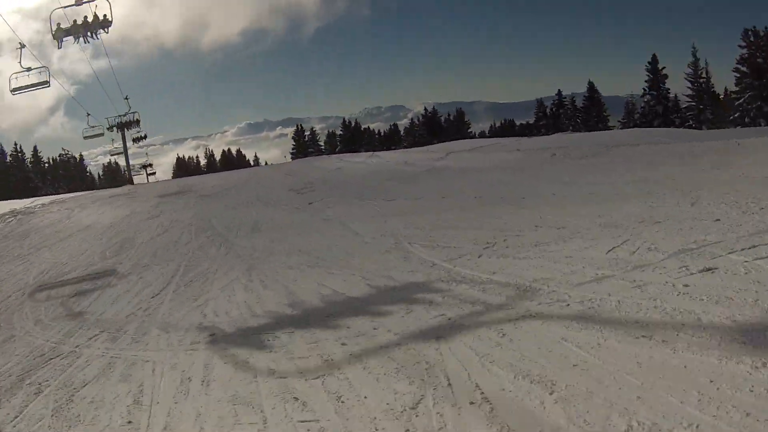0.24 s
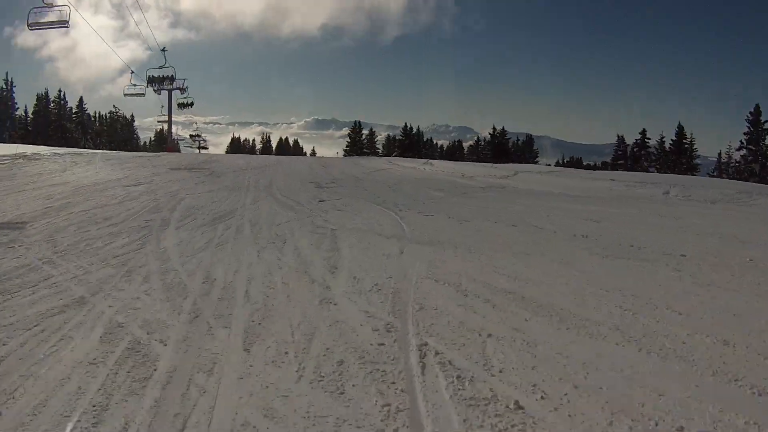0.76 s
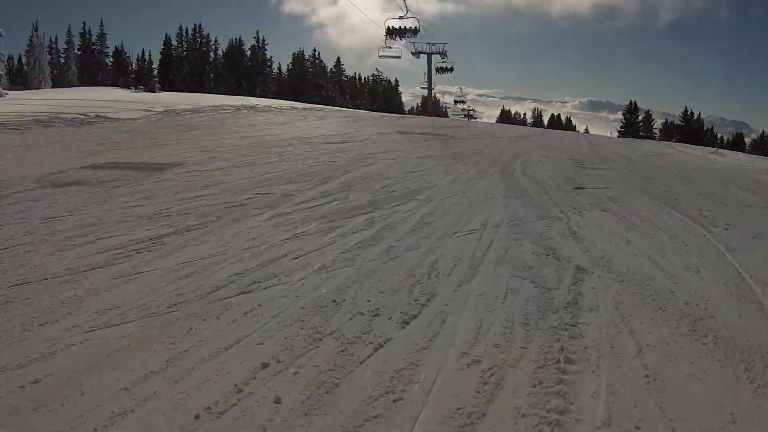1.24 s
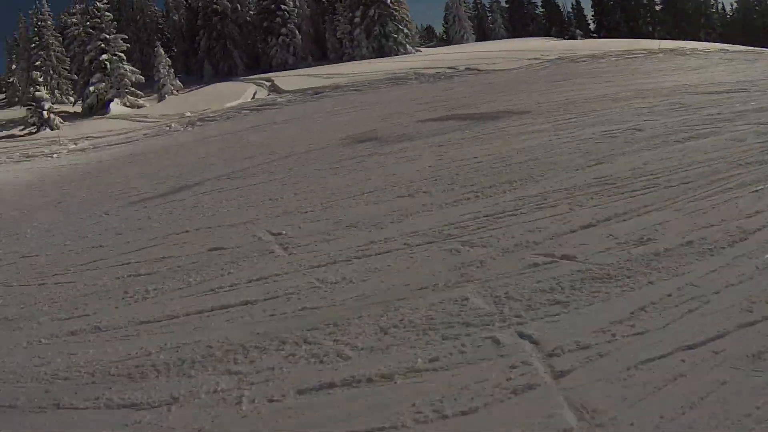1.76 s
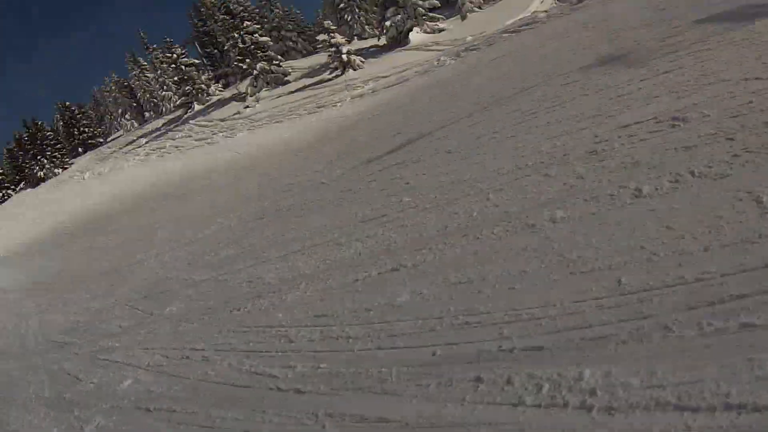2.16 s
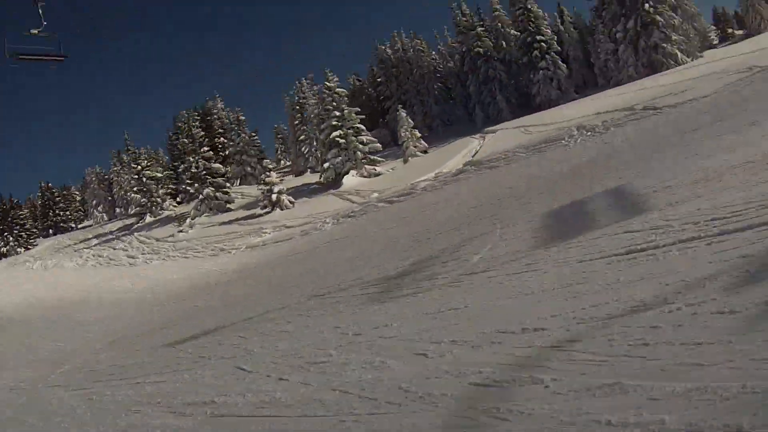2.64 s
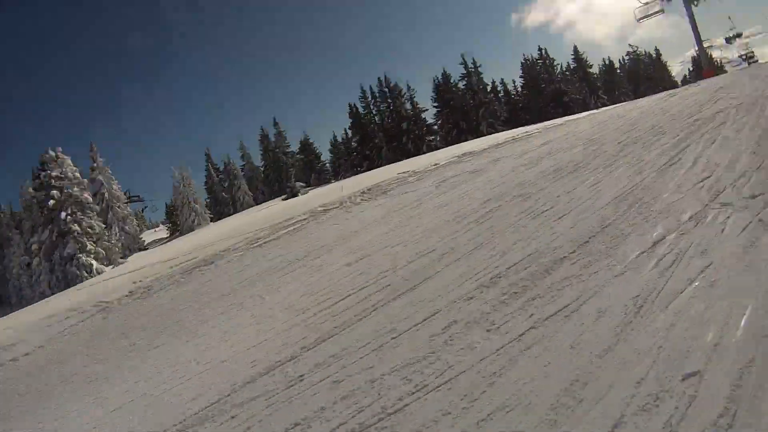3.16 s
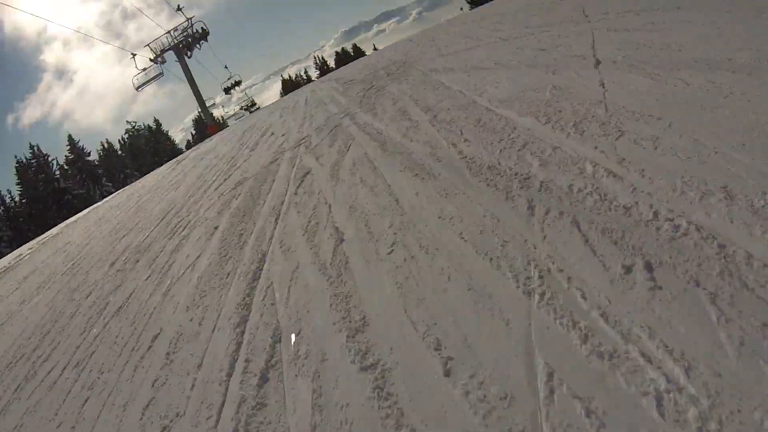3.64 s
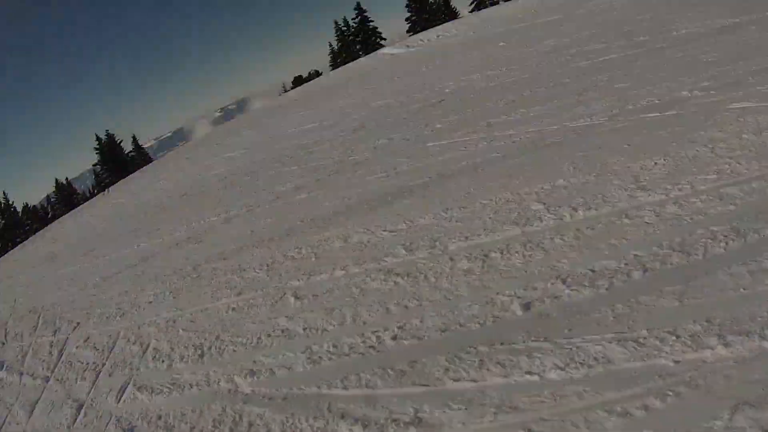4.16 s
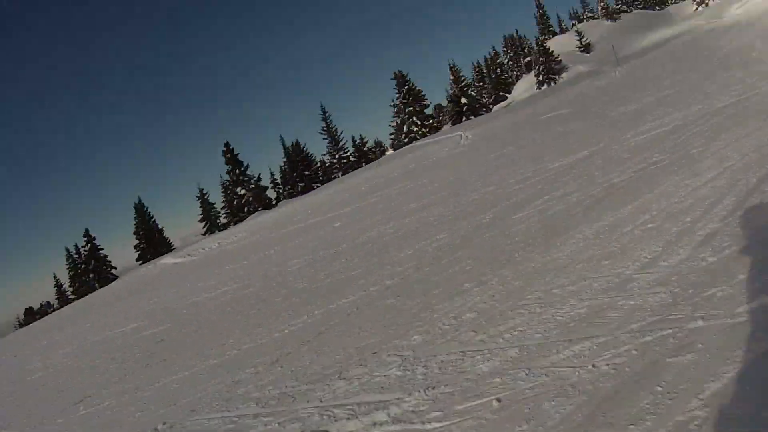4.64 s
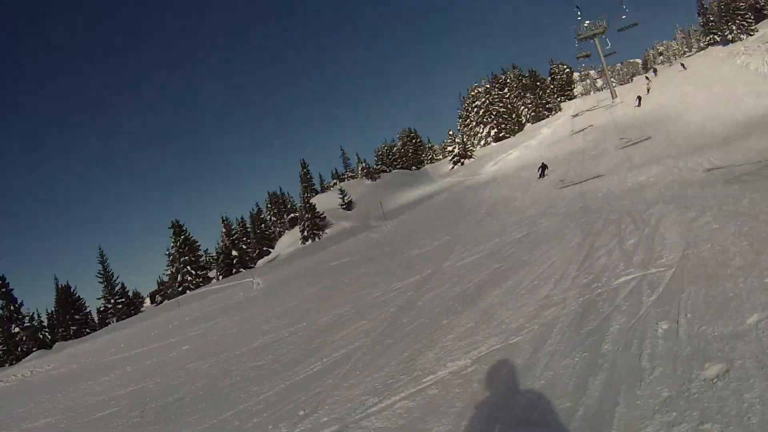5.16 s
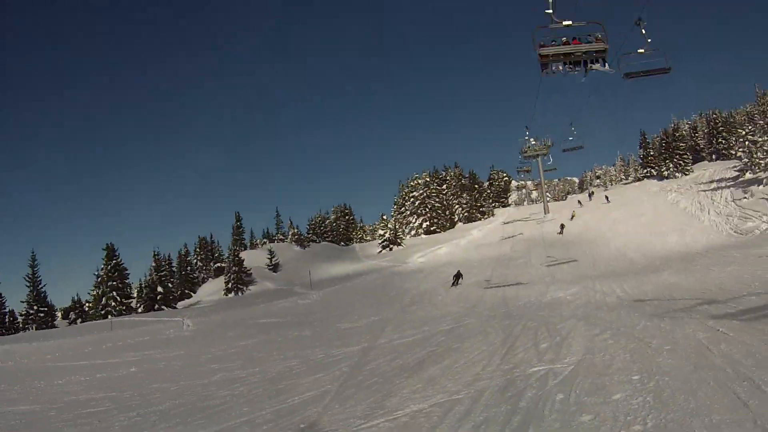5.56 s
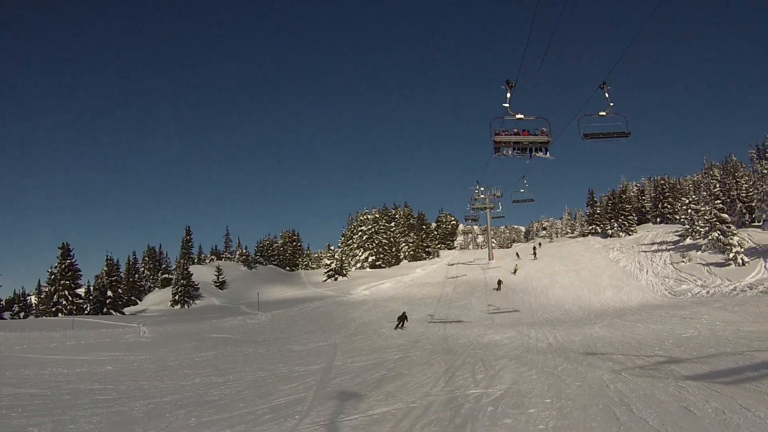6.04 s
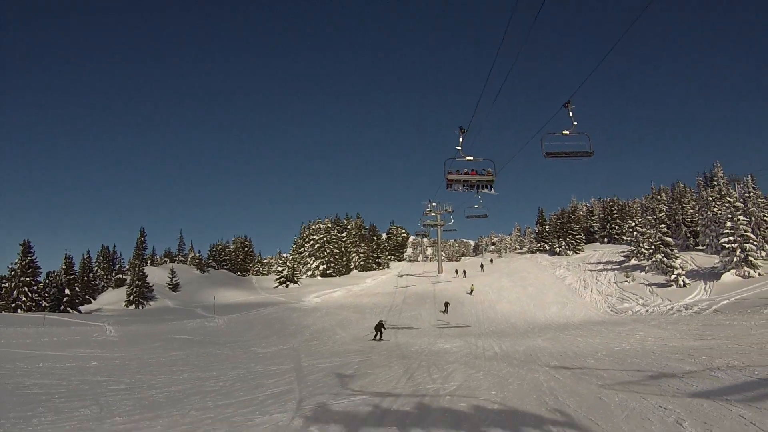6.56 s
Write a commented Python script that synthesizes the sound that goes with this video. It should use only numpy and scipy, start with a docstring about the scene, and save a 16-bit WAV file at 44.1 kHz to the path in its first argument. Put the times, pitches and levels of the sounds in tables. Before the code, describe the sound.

Inside a closed plastic camera case on a skier, edges scrape grainily over hard-packed snow with a soft hiss of spray. Wind rumbles and buffets. Dry knocks cluster after one second, peak violently just after two, and return in sharp blows until about five and a half. Then scraping and wind drop to a faint glide with sparse ticks.

```python
"""On a hard-packed piste a skier carves turns, wearing a camera in a closed plastic case.
Steel edges fracture the crust grain by grain and throw snow, heard as scrape, crunch and filtered-noise hiss.
Bumps make the case knock on its mount, and jolts swing it; wind noise rumbles and rushes over it.
Its resonances colour the scrape, flexing, crunch and knocks; most of the treble is shut out."""
import sys
import numpy as np
from scipy import signal
from scipy.fft import rfft, irfft
from scipy.io import wavfile
from scipy.ndimage import map_coordinates

SR = 44100
rng = np.random.default_rng(int(sys.argv[2]) if len(sys.argv) > 2 else 0)


def unload_wav(signal):
    """Save mono or channel-first audio to the path in sys.argv[1] as 16-bit WAV at rate SR, clipped to [-1, 1]."""
    wavfile.write(
        sys.argv[1],
        SR,
        np.round(np.clip(np.atleast_2d(signal).T, -1, 1) * 32767).astype(np.int16),
    )


N = 300304

# edges on the snow through the turns, before trim and grip: [t/s, scrape level/dB, spray level/dB]
EDGE_LEVELS = [(0.0, -42.7, -55.5), (0.49, -42, -54.5), (1.18, -41, -53), (1.36, -46, -57.5),
               (1.62, -48, -60), (1.85, -47, -58.5), (2.05, -39.5, -60), (2.24, -39, -57.5),
               (2.56, -43.5, -54.5), (2.69, -42, -58), (2.8, -50, -65), (2.93, -48.5, -64),
               (3.15, -56, -63.5), (3.28, -49.5, -62), (3.41, -44.5, -57.5), (3.66, -40.5, -55),
               (3.93, -40, -52.5), (4.2, -41.5, -52.5), (4.5, -45.5, -54), (5.01, -49, -54.5),
               (5.24, -52.5, -58), (5.37, -54, -62), (5.52, -49.5, -68), (5.68, -58, -67),
               (6.1, -60.5, -67.5), (6.81, -64, -70)]
# air flowing along the case, before trim and eddies: [t/s, rush level/dB]
WIND_LEVELS = [(0.0, -42.5), (0.66, -40), (1.6, -47.5), (1.93, -46.5), (2.27, -40), (2.58, -39),
               (3.02, -51.5), (3.17, -53.5), (3.35, -43.5), (4.23, -39.5), (4.8, -47.5), (4.95, -49),
               (5.2, -56.5), (5.36, -54), (5.44, -45), (5.58, -47.5), (5.69, -56), (5.88, -54),
               (6.16, -57.5), (6.39, -63.5), (6.81, -62.5)]
# gusts on the case in the turns, before trim and eddies: [start t/s, end t/s, level/dB]
GUST_SPANS = [(1.99, 2.218, -34), (2.306, 2.53, -35), (2.57, 2.92, -33.3), (4.47, 4.53, -34),
              (4.59, 4.92, -35.5), (5.118, 5.2, -40.5), (5.388, 5.507, -41), (5.6, 5.68, -41)]
# knocks of the case on its mount: [t/s, level/dB, most excited resonance f/Hz, low body/dB,
# ring near 2.3 kHz/dB, crack/dB]; the last three are relative to a plain knock, which omits them
KNOCK_EVENTS = [(0.0286, -35.5, 915), (0.054, -35, 900), (0.2535, -32, 895, 7, -3, 4), (0.7989, -36, 700),
                (0.8655, -35, 1580), (0.9402, -28.0, 1400, 2, 6, -3.0), (0.9583, -26.5, 1000, -6, -5, -5),
                (1.0327, -25.0, 696, -6, -11, -10.0), (1.0941, -28, 1000, -1, -4, -12), (1.143, -34, 950),
                (1.173, -31, 1400, 12, 9, 6.0), (1.1962, -26.5, 900, 14, 9, 3.0),
                (1.2152, -31.0, 900, -9, 4.0, 1.0), (1.443, -35.5, 800), (1.4918, -32.5, 800),
                (1.5147, -24.0, 500, -17.5, -3.0, -0.5), (1.5269, -35, 900),
                (1.535, -26.5, 1500, -3, 1.0, 5.5), (1.6433, -36, 1000),
                (1.653, -28.5, 1500, 29, -5.0, -1.0), (1.7029, -26, 900, 13, -5, -4), (1.7088, -30, 900),
                (1.7448, -24.5, 800, 5.0, -2.5, -9), (1.7755, -16.5, 1100, -14.5, 14.5, 0),
                (1.8635, -40, 1030), (1.875, -37, 500), (1.9237, -12.5, 1770, -3, 0, 0),
                (1.9797, -36, 1100), (2.0119, -16.0, 900, -7.5, -1.5, -2), (2.0444, -27, 1700, 3, 11, 5.0),
                (2.1041, -16.0, 1800, -6, 19.5, 7.5), (2.1156, -25.0, 800, 3.0, 3.0, -7.0),
                (2.1276, -27, 900, 4, 6, -5.0), (2.1356, -32, 500), (2.1687, -32, 1460),
                (2.1871, -6, 1100, -2, -6, 7), (2.2205, -22.5, 1810, -5, 1, 6.5), (2.235, -31, 2200),
                (2.3262, -24.5, 990, 8.0, -5, 2), (2.391, -27, 1900, 6.5, 2.0, -3.0),
                (2.4519, -18.0, 890, 1.0, 2.5, 7), (2.4952, -26.0, 1900, 6, -6, -5), (2.5585, -35, 2200),
                (2.5723, -37, 900), (2.7328, -20.5, 1820, -10, -10, 0.5), (2.7895, -35.5, 900),
                (2.8745, -40, 1420), (2.8902, -28.5, 2280), (2.918, -29, 1600, 2.0, 3, 8.0),
                (2.9246, -31.0, 2300, -10, -2, 7), (3.0046, -37.5, 1700), (3.0206, -32.5, 800, -8, -7.0, 4),
                (3.031, -35.5, 2020, -19.0, -3.0, 4), (3.0649, -39.0, 900, 2.0, -1, 14),
                (3.0722, -40.5, 900, -4, 2.0, 7), (3.1205, -42, 500, 28.0, -1.0, -0.0), (3.1449, -46, 900),
                (3.2446, -30, 1700, 18, -7, -3.0), (3.3051, -24, 1800, 2, 2, 7),
                (3.318, -11, 910, -5, 0, 5), (3.4442, -29, 2300, -3, -14, -0.0), (3.6061, -31, 1300),
                (3.6731, -28.5, 2210, -4, -6, 4.0), (3.6861, -28.0, 2300, 4, 2.0, 10), (3.711, -34, 1420),
                (3.7523, -21, 900, 6, 4, -2), (3.7683, -28.0, 700), (3.8105, -20.5, 800, -13.5, -3.0, 2),
                (3.871, -15, 1710, -22, 14.0, 4), (3.9624, -36, 900), (4.12, -33.5, 2300),
                (4.1441, -26, 900, -3.0, 3.5, 5), (4.1505, -31, 900), (4.2107, -28, 900, 2, 2.0, 10),
                (4.2176, -29.5, 1460), (4.2417, -29.5, 1800, 4.5, 7.5, 12), (4.3058, -36, 500),
                (4.344, -32.5, 600, 6, 3.0, 14), (4.3995, -32.5, 900, -6.0, -10, -11.0),
                (4.5085, -10.5, 2300, -9.5, 8.5, 9.5), (4.5191, -34, 900), (4.5611, -36, 900),
                (4.5906, -22.5, 1500, -16, 12, 7), (4.6437, -19.5, 1000, -12, 12.0, 0), (4.7414, -39, 990),
                (4.7892, -27.5, 1500, -7, 9, 5.0), (4.8214, -36.5, 2300), (4.843, -30.5, 2300),
                (4.943, -25, 815), (4.955, -29.5, 700, 1, 6.0, -2.0), (4.998, -28.5, 1400, 6.5, 7.5, 2.0),
                (5.0975, -26, 1200, -9.5, -5.0, -4), (5.1202, -37, 500),
                (5.1285, -34.5, 700, 8, 11.0, 10.0), (5.1396, -37.0, 1400),
                (5.1556, -16.0, 1510, -8, 12, 20), (5.173, -37, 2300), (5.1916, -38.5, 1800),
                (5.2897, -34, 2320), (5.3879, -14.5, 2300, -2.5, -1.0, -5.0),
                (5.4252, -14.5, 1090, 1.5, 10.5, 7), (5.4526, -32.5, 2300, 10.0, -1.0, 9.0),
                (5.4686, -27, 1500, 0, 4, 4), (5.4728, -29.5, 800, 4, 7.5, 3), (5.519, -40, 820),
                (5.5305, -35.5, 500, 16.0, -8.0, -2.0), (5.554, -34.5, 1400, 18, 11, 9),
                (5.5654, -23, 2300, -3, -1, 9.0), (5.6437, -35, 1000), (5.7219, -30.5, 1300, -1.0, -1, -6),
                (5.7297, -23.5, 800, -9, -2, -1), (5.7415, -33.0, 1100, 3, 1.0, 11), (5.7515, -34.5, 1400),
                (5.854, -36.5, 900, 9, -4.0, -6.0), (5.8813, -35, 800), (5.9737, -41, 1500, 13, -6.0, 7),
                (6.0642, -47, 800), (6.0981, -31.5, 1400, 0, 3, 4), (6.1642, -30, 2200), (6.1713, -36, 800),
                (6.2943, -30.5, 1400, 4, 11.5, 10.5), (6.3401, -49, 1400),
                (6.4348, -44, 2300, 14, -14, -7.0), (6.4993, -51, 2300), (6.5682, -32, 1390, 0, 8, 4),
                (6.7066, -42.0, 2300)]
# jolts that push the whole case: [t/s, envelope peak level/dB, f/Hz]
THUMP_EVENTS = [(0.335, -21.5, 183), (2.188, -14, 193), (2.451, -20, 194), (4.15, -21, 248),
                (4.171, -16.5, 222), (5.156, -17.5, 130), (5.426, -19, 246), (5.563, -20.5, 292)]
# stretches of rutted crust: [start t/s, end t/s, crunch level/dB]
RUT_SPANS = [(1.56, 1.72, -46), (1.87, 2.0, -46), (2.13, 2.29, -48), (2.3, 2.33, -36), (2.33, 2.88, -50),
             (5.98, 6.08, -57)]
# direction of the spray: [t/s, power share past the camera's front (0 = all away from it)]
SPRAY_DIRECTION = [(0, 0.033), (3.2, 0.03), (3.65, 0.75), (4.1, 0.86), (5.2, 0.77), (5.6, 0.16),
                   (6.81, 0.3)]
# resonances of the case: [f/Hz, width at half lift/Hz, lift at full share/dB]
CASE_RESONANCES = [(545, 190, 2), (900, 280, 8.3), (1045, 140, 3), (1425, 300, 8.7), (1830, 170, 3.5),
                   (2323, 370, 8), (3010, 200, 3.5), (3710, 350, 5), (6350, 310, 5.5)]

# spectral densities, each up to an overall level: [f/Hz, level/dB per Hz]
# ice scraped by the edges
SCRAPE_SPECTRUM = [(200, -18.5), (700, -7), (1150, -8.8), (1600, 1.3), (2100, -2.4), (2600, -7),
                   (2950, -17.5), (3800, -22), (5000, -24.5), (9000, -52.5), (15000, -72)]
# flexing skis
FLEX_SPECTRUM = [(120, -9), (300, 0), (500, 3.5), (900, -7.5), (1300, -25), (2500, -27), (5000, -57.5)]
# spray flying away from the camera
SPRAY_AWAY_SPECTRUM = [(1800, -14.5), (3100, -1), (3700, 5.5), (4200, -0.5), (4900, -0.5), (5600, -8.5),
                       (6100, -6.5), (7000, -17), (8200, -16.5), (10000, -28.5), (12000, -32.5),
                       (15000, -48)]
# spray flying past the front of the camera
SPRAY_FRONT_SPECTRUM = [(1800, -8.5), (2700, 4), (3200, -13), (3900, 7), (4600, -3), (5400, 0), (6400, -13),
                        (7600, -16), (8700, -10), (10000, -20.5), (11300, -24), (12700, -26), (15000, -35)]
# large eddies buffeting the case
BUFFET_SPECTRUM = [(8, -25.5), (25, -11.5), (48, -5), (64, 2.5), (82, -5), (120, -9.5), (200, -21),
                   (500, -43.5), (2000, -72)]
# deepest rumble of the wind
DEEP_SPECTRUM = [(8, -11.5), (25, -2.5), (40, -6), (70, -19.5), (200, -48.5), (1000, -80)]
# small eddies along the walls; also the low rumble of the skis
RUSH_SPECTRUM = [(40, -12.5), (110, 1.5), (200, -1), (300, -7), (500, -15.5), (1200, -44), (4000, -86.5)]
# hiss of the microphone
HISS_SPECTRUM = [(1000, 0.5), (5000, 2), (8000, -3.5), (12000, -7), (13000, -14.5), (15000, -30)]
# contact of the case and its mount, without the resonances
KNOCK_SPECTRUM = [(40.0, -18.0), (200.0, -0.5), (400.0, 0), (700.0, -3.5), (1200.0, -2.1), (2000.0, -2.6),
                  (2550.0, -7.0), (2820.0, -17.5), (3700.0, -25.2), (4400.0, -29.5), (5400.0, -30),
                  (6100.0, -37.2), (6700.0, -35), (8500.0, -50), (11500.0, -55.5), (15000.0, -74)]
# coarse crust breaking
CRUNCH_SPECTRUM = [(150, -22), (500, -4), (1000, 0), (1250, -13), (12000, -100)]
# ski sliding sideways
SKID_SPECTRUM = [(4500, -29), (6000, 0), (6700, 3.5), (7800, -7), (9200, -8), (10500, -18), (15000, -23)]

# a bump shakes the skis: time constants (s), level for a 0 dB knock (dB), dB of shaking per dB of knock
SHAKE_RISE_S, SHAKE_DECAY_S, SHAKE_DB, SHAKE_GROWS = 0.0035, 0.052, -39.3, 0.67
# steady judder and crumbs relative to the tabled scrape, rumble relative to the shaking (dB)
JUDDER_DB, CRUMBS_DB, RUMBLE_DB = -9, -5.5, -3.5
# buffeting between gusts: level for a 0 dB rush (dB), dB of buffet per dB of rush
BUFFET_DB, BUFFET_GROWS = -18, 0.59
# deepest rumble: level for a 0 dB buffet (dB), dB of rumble per dB of buffet
DEEP_DB, DEEP_GROWS = -19.7, 0.61
# rise and fall of a gust or a stretch of ruts (s)
SPAN_EDGE_S = 0.035
# room for the scuff before a blow (s); range of time from first touch to blow (s)
LEAD_S, TOUCH_S = .008, (0.00031, .001)
# lift of the most excited resonance (dB), its width (Hz); its range for small ticks (Hz)
STRUCK_DB, STRUCK_WIDTH_HZ, TICK_HZ = 7, 580, (700, 2360)
# scatter of the resonances' strength and pitch between knocks (standard deviation, as shares)
STRENGTH_SCATTER, PITCH_SCATTER = .14, .012
# skid at the beginning of a turn: peak time (s), level before flutter (dB), slopes (dB per s)
SKID_S, SKID_DB, SKID_RISE_DB_PER_S, SKID_FALL_DB_PER_S = 3.61, -62, 70, 19
# gain control: threshold (full scale), gain divisor added per full-scale second, recovery (s)
OVERLOAD, DUCK_PER_S, RECOVER_S = .8, 450, .05
# upper band limit of the camera (Hz)
TOP_HZ = 15100


def amp(db):
    """Logarithmic level: decibels become an amplitude ratio."""
    return 10 ** (np.asarray(db) / 20)


def unit(x):
    """Normalization: the mean power is brought to one."""
    return x / np.sqrt(np.mean(x ** 2) + 1e-20)


def along(points, hz):
    """Logarithmic frequency: values are interpolated on a log axis."""
    f, v = np.transpose(points)
    return np.interp(np.log(hz + 1), np.log(f), v)


def curves(rows):
    """Linear interpolation: each column after the time gives one value per sample."""
    s, *columns = np.transpose(rows)
    t = np.arange(N) / SR
    return [np.interp(t, s, column) for column in columns]


def wobble(rate):
    """Slow random fluctuation: a spline through random knots, rate of them a second."""
    knots = rng.standard_normal(int(N * rate / SR) + 4)
    return map_coordinates(knots, [np.arange(N) * rate / SR])


def add(track, s, sound):
    """Superposition: a sound is summed into the track from s seconds on."""
    part = track[round(s * SR):][:len(sound)]
    part += sound[:len(part)]


def causal(gain_db):
    """Minimum phase: folding the cepstrum gives the promptest response with these gains."""
    cepstrum = irfft(np.log(amp(gain_db)))
    half = len(cepstrum) // 2
    cepstrum[1:half] *= 2
    cepstrum[half + 1:] = 0
    return irfft(np.exp(rfft(cepstrum)))


def case_peaks(hz):
    """Resonance: each mode of the case lifts a bell-shaped band, one row of dB each."""
    return np.array([lift_db / (1 + (2 * (hz - centre) / width) ** 2)
                     for centre, width, lift_db in CASE_RESONANCES])


def coloured(x, spectrum, ring=0, size=8192):
    """Linear filtering: a spectrum and any share (ring) of the case's resonances shape x, at rms 1."""
    hz = np.fft.rfftfreq(size, 1 / SR)
    response = causal(along(spectrum, hz) + ring * case_peaks(hz).sum(0))
    return unit(signal.fftconvolve(x, response)[:N])


def grains(rate, spread_db):
    """Shot noise: randomly timed impulses of uneven size, rate a second, at rms 1."""
    present = rng.random(N) < rate / SR
    sizes = rng.standard_normal(N) * amp(spread_db * rng.standard_normal(N))
    return unit(present * sizes)


def stretches(rows):
    """Power addition: (start, end, dB) spans that rise, hold and fall are summed as power."""
    t, power = np.arange(N) / SR, 0
    for start, end, db in rows:
        gate = np.clip(np.minimum(t - start, end - t) / SPAN_EDGE_S + .5, 0, 1)
        power = power + (amp(db) * gate) ** 2
    return power


def shaking():
    """Transient vibration: the skis' amplitude swells into each bump and decays exponentially after."""
    t, power = np.arange(0, N, 64) / SR, 0
    for s, db, *_ in KNOCK_EVENTS:
        fade = np.where(t < s, (s - t) / SHAKE_RISE_S, (t - s) / SHAKE_DECAY_S)
        bump = amp(SHAKE_DB + SHAKE_GROWS * db) * np.exp(-np.abs(fade))
        power = power + bump ** 2
    return np.interp(np.arange(N) / SR, t, np.sqrt(power))


def judder():
    """Incoherent addition: the flexing joins a steady share of scrape and the shaking from bumps."""
    scrape_db = curves(EDGE_LEVELS)[0]
    return np.hypot(amp(scrape_db + JUDDER_DB), shaking())


def spray():
    """Broadband noise: fine snow hisses off the edges, brighter past the front of the case."""
    side = np.clip(curves(SPRAY_DIRECTION)[0], 0, 1)
    away = coloured(rng.standard_normal(N), SPRAY_AWAY_SPECTRUM)
    front = coloured(rng.standard_normal(N), SPRAY_FRONT_SPECTRUM)
    # equal-power crossfade
    return np.sqrt(1 - side) * away + np.sqrt(side) * front


def skis():
    """Brittle fracture: steel edges break the crust by grains; ribs in the snow modulate their grip."""
    scrape_db, spray_db = curves(EDGE_LEVELS)
    grip = unit(wobble(14) + wobble(70))
    crust = coloured(grains(rate=2600, spread_db=0.0), SCRAPE_SPECTRUM, ring=0.39)
    crust *= amp(scrape_db - 0.7 + 0.52 * grip)
    crumbs = coloured(grains(rate=150, spread_db=2.0), SCRAPE_SPECTRUM, ring=.6)
    crumbs *= amp(scrape_db + CRUMBS_DB + grip)
    flex = coloured(grains(rate=1200, spread_db=6.0), FLEX_SPECTRUM, ring=0.17)
    flex *= judder() * amp(1.5 * grip)
    rumble = coloured(rng.standard_normal(N), RUSH_SPECTRUM) * shaking() * amp(RUMBLE_DB)
    thrown_snow = amp(spray_db - 1.5 + .4 * grip) * spray()
    return crust + crumbs + flex + rumble + thrown_snow


def buffeting(rush_db):
    """Flow noise: the buffeting level in dB grows with the air flow, plus the power of the gusts."""
    steady_power = amp(BUFFET_DB + BUFFET_GROWS * rush_db) ** 2
    return 10 * np.log10(steady_power + stretches(GUST_SPANS))


def wind():
    """Turbulence: large eddies buffet the case over a deep rumble; small ones rush along its walls."""
    rush_db, = curves(WIND_LEVELS)
    buffet_db, eddies = buffeting(rush_db), wobble(16)
    deep = coloured(rng.standard_normal(N), DEEP_SPECTRUM) * amp(DEEP_DB + DEEP_GROWS * buffet_db)
    buffet = coloured(rng.standard_normal(N), BUFFET_SPECTRUM) * amp(buffet_db - 0.7 + 2.3 * eddies)
    rush = coloured(rng.standard_normal(N), RUSH_SPECTRUM)
    rush *= amp(rush_db + 1.67 + 1.1 * eddies + 1.7 * wobble(45))
    return deep + buffet + rush


def microphone_hiss():
    """Stationary noise: the microphone adds a faint hiss of constant level."""
    return amp(-70.5) * coloured(rng.standard_normal(N), HISS_SPECTRUM)


def knock(db, hz_struck, body_db=0, ring_db=0, crack_db=0, size=1024):
    """Impact excitation: touch, blow and rebounds ring the modes; the landing point favours one."""
    hz, t = np.fft.rfftfreq(size, 1 / SR), np.arange(size) / SR - LEAD_S
    strengths = 0.9 + STRENGTH_SCATTER * rng.standard_normal(len(CASE_RESONANCES))
    pitch = 1 + PITCH_SCATTER * rng.standard_normal()
    colour = along(KNOCK_SPECTRUM, hz) + strengths @ case_peaks(hz * pitch)
    colour += STRUCK_DB / (1 + (2 * (hz - hz_struck) / STRUCK_WIDTH_HZ) ** 2)
    colour += body_db * along([(600, 1), (1400, 0)], hz)
    colour += ring_db * along([(1500, 0), (2200, 1), (2600, 1), (3100, 0)], hz)
    colour += crack_db * along([(2600, 0), (3300, 1)], hz)
    # light contacts are mostly scuffing, hard ones nearly a single clean blow
    scuff = np.interp(db, [-34, -18], [.15, .035])
    # the scuff rises by 60 dB over lead_in seconds and falls by 60 dB in 19 ms
    lead_in = np.interp(db, [-32, -20], [.013, .005])
    fade_db = 60 * np.where(t < 0, -t / lead_in, t / 0.019)
    contact = scuff * rng.standard_normal(size) * amp(-fade_db)
    blow = round(LEAD_S * SR)
    contact[blow] += 1
    touch = blow - int(rng.uniform(*TOUCH_S) * SR)
    contact[touch] += 0.34 * rng.choice([-1, 1])
    rebounds = blow + (rng.uniform(0.00047, 0.002964, 2) * SR).astype(int)
    contact[rebounds] += 0.38 * rng.uniform(-0.97, 1, 2)
    sound = signal.fftconvolve(causal(colour), contact)[:size]
    # the level is the rms with all the energy spread over LEAD_S
    return amp(db) * sound * np.sqrt(LEAD_S * SR) / np.linalg.norm(sound)


def ticks(count=250):
    """Random small impacts: ticks grow wherever the skis judder or bite."""
    track = np.zeros(N)
    drive_db = (20 * np.log10(judder()) + curves(EDGE_LEVELS)[0]) / 2
    for at in rng.integers(0, N, count):
        force, body, ring = rng.uniform(-1.18, 1, 3)
        level_db = drive_db[at] + 5.5 + 5 * force
        add(track, at / SR, knock(level_db, rng.uniform(*TICK_HZ), 6 * body, 6 * ring))
    return track


def chatter():
    """Repeated impact: the case knocks dry and short on its mount, singly or in quick clusters."""
    track = np.zeros(N)
    for s, *blow in KNOCK_EVENTS:
        add(track, s - LEAD_S, knock(*blow))
    return track


def thumps():
    """Damped oscillation: a jolt swings the case through about one cycle."""
    track, t = np.zeros(N), np.arange(SR // 20) / SR
    # the envelope peaks after 1.4 ms
    swing = t / 0.0014
    for s, db, hz in THUMP_EVENTS:
        add(track, s, amp(db) * swing * np.exp(1 - swing) * np.sin(2 * np.pi * hz * t))
    return track


def crunch():
    """Coarse fracture: rutted crust breaks in dull grains that rattle the case's low resonances."""
    crust = coloured(grains(rate=700, spread_db=2), CRUNCH_SPECTRUM, ring=.5)
    return crust * np.sqrt(stretches(RUT_SPANS))


def skid():
    """Sliding friction: a ski slides sideways over icy snow, a quick swell and a slower fade."""
    t = np.arange(N) / SR - SKID_S
    fade_db = np.maximum(-t * SKID_RISE_DB_PER_S, t * SKID_FALL_DB_PER_S)
    flutter_db = .8 * wobble(25)
    return coloured(rng.standard_normal(N), SKID_SPECTRUM) * amp(SKID_DB - fade_db + flutter_db)


def scene():
    """Superposition: all sources sum as they arrive inside the case, over the microphone's hiss."""
    snow = skis() + crunch() + skid()
    impacts = ticks() + chatter() + thumps()
    return (snow + impacts + wind() + microphone_hiss())[None]


def record(dry):
    """Gain control and saturation: overloads briefly push the gain down, then a band limit acts."""
    excess = np.maximum(np.abs(dry) - OVERLOAD, 0)
    # the gain reacts 3 ms late
    late_excess = np.roll(excess, round(.003 * SR), axis=-1)
    load = signal.lfilter([1 / SR], [1, -np.exp(-1 / (SR * RECOVER_S))], late_excess)
    ducked = dry / (1 + DUCK_PER_S * load)
    clipped = ducked / (1 + ducked ** 8) ** (1 / 8)
    low_pass = signal.butter(12, TOP_HZ, fs=SR, output="sos")
    return signal.sosfiltfilt(low_pass, clipped)


dry = scene()
out = record(dry)
unload_wav(out)
```